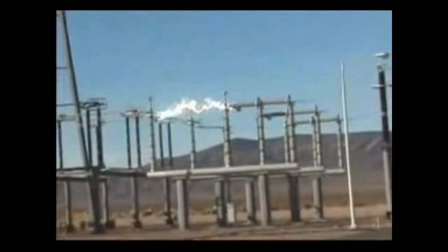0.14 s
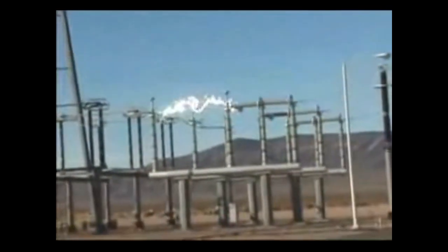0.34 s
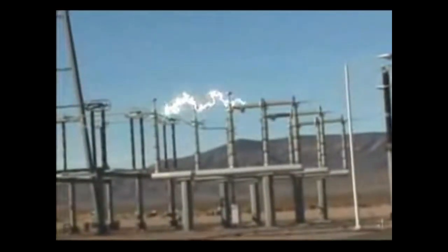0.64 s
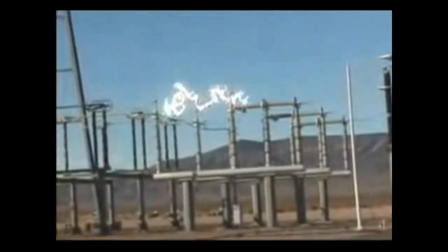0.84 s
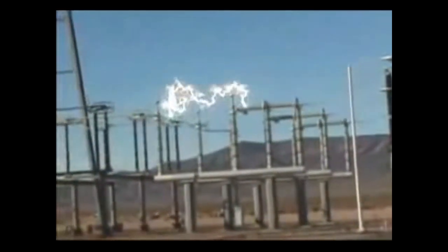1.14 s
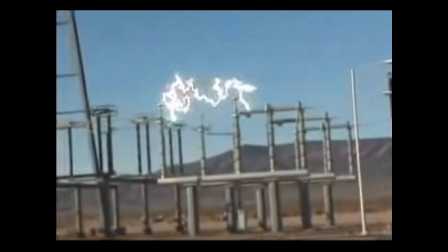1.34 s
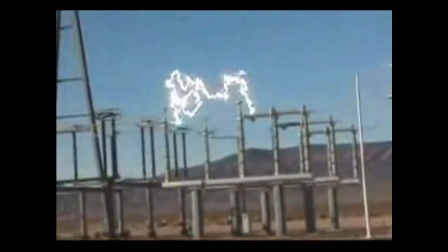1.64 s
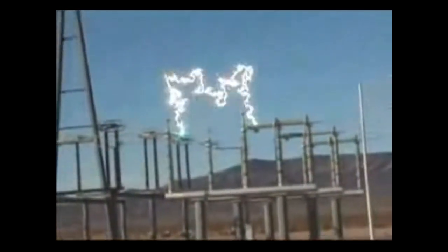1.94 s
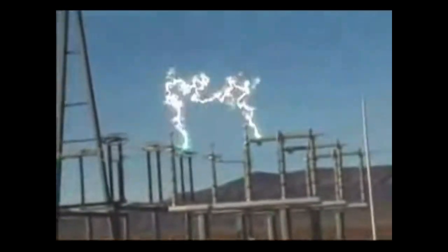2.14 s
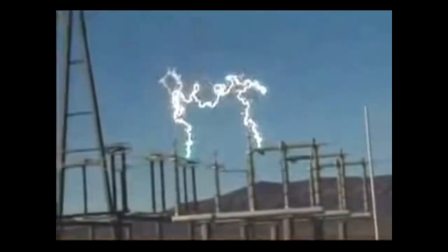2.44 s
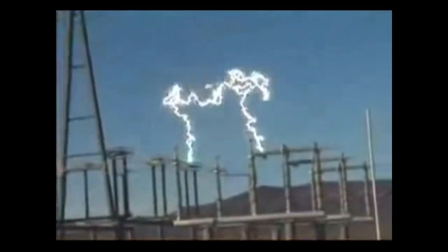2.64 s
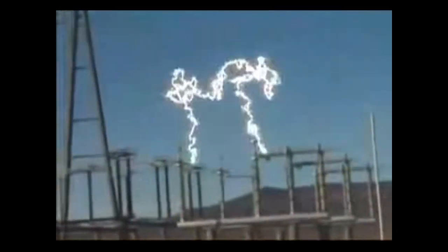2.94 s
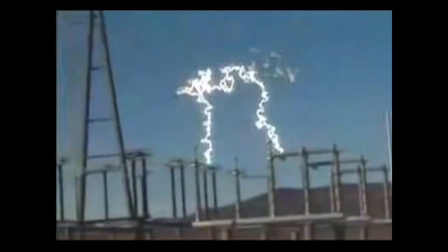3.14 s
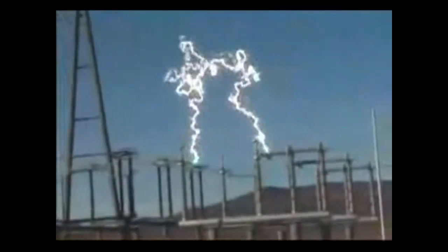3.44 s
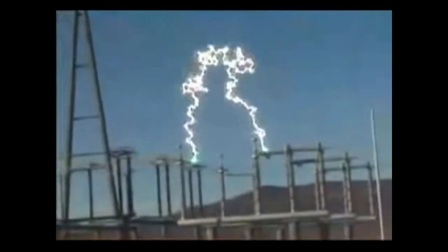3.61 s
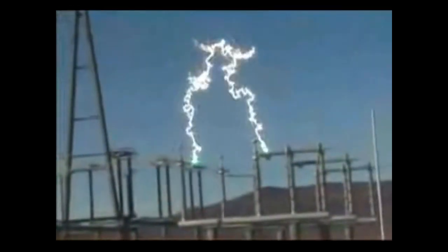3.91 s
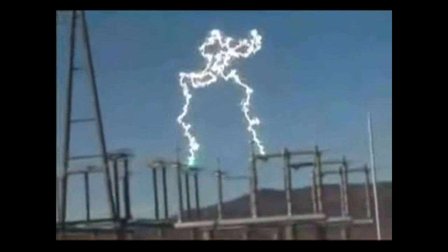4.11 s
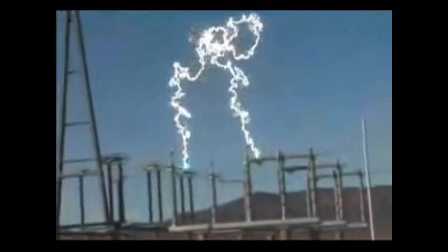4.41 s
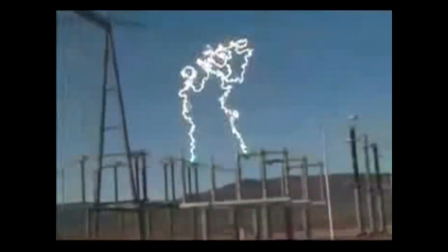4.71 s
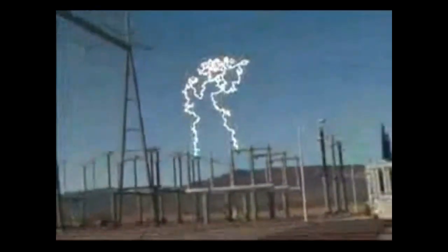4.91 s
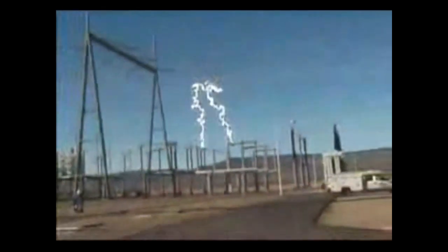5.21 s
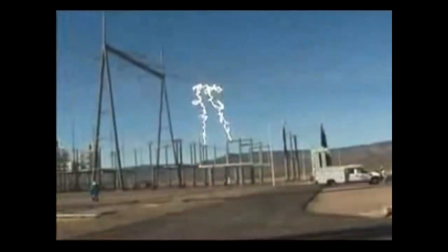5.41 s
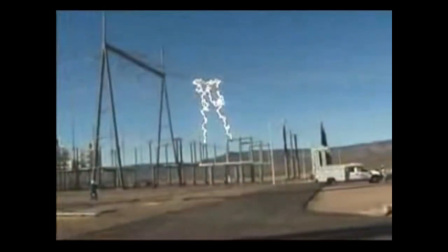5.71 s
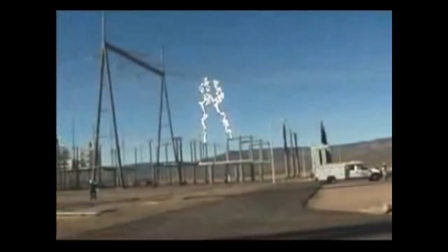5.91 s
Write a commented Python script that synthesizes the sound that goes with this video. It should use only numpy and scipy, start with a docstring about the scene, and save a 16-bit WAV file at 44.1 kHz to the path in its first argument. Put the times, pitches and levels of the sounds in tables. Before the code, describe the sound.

A high-voltage arc is already burning at 0 s in an open substation yard: a loud, low buzz pulsing about 120 times a second, with wavering harmonics and rough flutter. Over it lies dense, raspy crackle, mid-high sizzle and fine fizz. Through the first 1.6 s small dry snaps come rapidly and irregularly over fairly steady hum. From 1.6 to 2.3 s the crackle strengthens and snaps sharpen; at about 2.3 s a dull, low puffing thud. From 2.7 to 4.5 s the cracks are hardest, with a sizzling splash near 3.6 s, while the hum dips and surges unevenly. Around 4.8-5.5 s the low buzz is full again and snaps are sparser. A fainter, low thump falls near 5.6 s, then further sharp cracks, the buzz continuing to the end, about 6 s. Close ground echo thickens cracks, weak reflections follow, and wind is barely audible. Mono, slightly overloaded, with dulled extreme treble.

```python
"""Rising switch arc in a substation yard

A high-voltage switch opens outdoors and draws an arc that climbs and lengthens.
Its heat pulses twice per mains cycle: five wavering harmonics hum, filtered random shocks crackle.
Shorted loops snap as N-shaped shocks with a sizzle; collapsing large loops thud as a puff and a low swing.
The ground adds a lagging close echo, the yard dull delayed copies; light wind is low filtered noise."""
import sys
import numpy as np
from scipy import signal
from scipy.fft import rfft, irfft
from scipy.io import wavfile
from scipy.ndimage import map_coordinates

SR = 44100
rng = np.random.default_rng(int(sys.argv[2]) if len(sys.argv) > 2 else 0)


def generate_wav(signal):
    """Clip the signal to [-1, 1] and save it as 16-bit WAV at the path in sys.argv[1]."""
    frames = np.transpose(np.atleast_2d(signal))
    scaled = np.clip(frames, -1, 1) * 32767
    pcm = np.round(scaled).astype(np.int16)
    wavfile.write(sys.argv[1], SR, pcm)


N = 267246
TIME_S = np.arange(N) / SR

# levels of the hum's four lowest harmonics, before the hum's gain and waver: t/s, level/dB
HARMONIC_1 = [(0.0, -13), (0.47, -16.5), (0.49, -20), (0.73, -21.5), (1.0, -17), (1.82, -18.5), (1.89, -16),
              (2.27, -21.5), (2.29, -23), (2.34, -14.5), (2.47, -16), (2.6, -32), (2.63, -23.5),
              (2.9, -24.5), (3.03, -17), (3.36, -21.5), (3.46, -29), (3.54, -21), (3.62, -31), (3.67, -23),
              (3.82, -37), (3.88, -24), (4.05, -17), (4.11, -38), (4.2, -15.5), (4.35, -16), (4.44, -19.5),
              (4.84, -13), (4.94, -16.5), (5.51, -15), (5.55, -27), (5.66, -21.5), (6.05, -30)]
HARMONIC_2 = [(0.0, -23.5), (0.45, -17), (0.88, -19), (0.93, -17), (1.71, -19.5), (1.91, -37), (2.03, -27),
              (2.23, -25.5), (2.34, -30), (2.43, -20.5), (2.67, -18), (2.71, -23.5), (3.14, -25),
              (3.29, -29), (3.42, -21.5), (3.56, -32.5), (3.7, -19.5), (3.78, -40), (4.1, -19.5),
              (4.38, -35), (4.45, -20), (4.75, -29.5), (4.78, -37), (5.01, -25), (5.1, -31.0),
              (5.259, -25.5), (5.52, -27), (5.6, -35.5), (5.73, -23.5), (6.05, -26.5)]
HARMONIC_3 = [(0.0, -36.5), (0.25, -27.5), (0.58, -31), (0.71, -30), (0.76, -36), (0.87, -28.5),
              (1.03, -26), (1.33, -34), (1.4, -40), (1.54, -26), (1.66, -33), (1.72, -25), (2.17, -42),
              (2.31, -24), (3.26, -36), (3.37, -27), (3.83, -26), (3.9, -40), (4.34, -23), (4.51, -37),
              (4.63, -22), (4.87, -39.5), (5.18, -25.5), (5.24, -28.5), (5.7, -29), (5.79, -21.5),
              (5.94, -32), (6.05, -27)]
HARMONIC_4 = [(0.0, -46.5), (1.42, -44.5), (2.67, -43), (2.71, -35.5), (3.16, -37.5), (3.39, -37),
              (3.42, -38), (3.79, -32.5), (3.95, -28.5), (4.06, -40), (4.15, -37), (4.84, -35.5),
              (5.1, -31), (5.2, -41.5), (5.75, -31), (6.05, -36.0)]
# crackle's drive, before lulls and band gains: t/s, level/dB
CRACKLE_DRIVE = [(0, -32), (.34, -39.5), (.4, -34), (.54, -40.5), (.94, -34), (1.05, -38), (1.5, -33),
                 (1.58, -37), (1.64, -30.5), (1.76, -34.5), (1.92, -29.5), (2.04, -32), (2.32, -26),
                 (2.38, -32), (2.86, -27), (2.92, -31), (3.42, -27.5), (5.6, -30), (5.75, -27.5)]
# rise of the arc: t/s, extra path to listener/ms, ground echo lag/ms, spread of that lag/share,
# flutter level/dB, scatter of the spits' arrival/ms, trend of the crackle's body/dB
ARC_RISE = [(0, 4.64, 1.04, 0.28, -28, 0.97, -31.5), (1.1, 5.2, 1.045, 0.44, -29, 0.96, -29),
            (2.1, 7.55, 1.345, 0.17, -26, 2.14, -28), (3.1, 7.27, 1.616, 0.36, -27.5, 2.18, -28),
            (4.4, 8.5, 1.913, 0.24, -28.5, 2.5, -27), (6.06, 9.1, 2.1, 0.3, -28, 2.45, -27.5)]
# small loops shorting out, before gains: t/s, shock level/dB, shock length/ms, sizzle level/dB
LOOP_SNAPS = [(0.0552, -8.5, 0.91, -34.5), (0.1254, -11.5, 0.65, -31), (0.1582, -10, 0.79, -32.5),
              (0.2048, -13, 0.73, -36), (0.22, -13, 0.98, -39.5), (0.317, -11.5, 0.84, -39.5),
              (0.3204, -17, 0.6, -33), (0.3809, -14, 0.85, -33), (0.3966, -19.5, 0.7, -21.5),
              (0.4171, -13.5, 0.55, -41), (0.4318, -11, 0.56, -40.5), (0.4792, -11, 0.55, -27),
              (0.5967, -10, 0.82, -39.0), (0.674, -11, 0.81, -38), (0.7131, -11.5, 0.85, -41),
              (0.732, -14.5, 0.88, -39), (0.7424, -12, 0.61, -42), (0.8425, -19, 1, -42),
              (0.8578, -14, 0.35, -35.5), (0.9427, -12, 0.93, -35), (0.9624, -14, 0.46, -27),
              (0.9981, -26, 0.41, -19.5), (1.0327, -14, 0.42, -34.5), (1.0395, -10, 0.85, -41.5),
              (1.1187, -11.5, 0.89, -40.0), (1.1314, -17, 1, -36.0), (1.1558, -12, 0.69, -36),
              (1.2195, -14, 0.93, -33.5), (1.256, -15, 1, -38.5), (1.2807, -15, 0.88, -35.5),
              (1.3518, -16, 0.9, -43), (1.462, -11, 0.78, -28), (1.5026, -14.5, 0.31, -23),
              (1.6238, -10.0, 0.42, -26.5), (1.6329, -13, 0.87, -29.5), (1.6591, -12, 0.78, -22),
              (1.7296, -17, 0.77, -29), (1.7682, -6, 0.63, -31), (1.8221, -7, 0.3, -37),
              (1.9147, -17, 0.92, -24), (1.9245, -12, 0.66, -21.5), (1.9711, -8, 0.92, -20.5),
              (2.0764, -8, 1, -31), (2.149, -10, 1, -38.5), (2.1636, -14, 0.74, -26.0),
              (2.1799, -7.5, 0.92, -25.5), (2.1913, -10, 1, -23), (2.2662, -9, 1, -22.5),
              (2.3434, -15, 0.95, -22), (2.5708, -8, 0.85, -39.5), (2.696, -4.5, 0.77, -29),
              (2.761, -5, 0.33, -28.5), (2.8701, -4, 0.47, -21.0), (2.8793, -6, 1, -18.5),
              (2.882, -12, 0.95, -23), (2.9235, -2.5, 0.41, -29), (2.9976, -4.5, 0.47, -18.5),
              (3.0004, -13, 0.7, -25), (3.143, -11, 0.81, -28.5), (3.277, -6, 0.72, -36),
              (3.4127, -6, 0.41, -28.5), (3.4202, -6, 0.41, -21), (3.5378, -10, 0.62, -26),
              (3.5525, -4, 0.79, -17), (3.6233, -7, 0.68, -10.5), (3.6248, -12, 1, -17.5),
              (3.8516, -1.5, 0.42, -21), (3.8996, -4.5, 0.28, -30), (3.9462, -4, 0.43, -20),
              (4.1, -7.0, 0.35, -25), (4.2057, -10.5, 0.69, -31.5), (4.283, -5, 1, -18.5),
              (4.38, -6.5, 0.81, -25), (4.3926, -5.5, 0.65, -33), (4.4305, -4, 0.49, -33),
              (4.5043, -6.5, 0.59, -32.5), (4.6005, -9, 0.3, -21.0), (4.9256, -8.5, 0.32, -31),
              (4.9836, -5, 0.45, -31), (5.0546, -6.5, 0.26, -25.5), (5.2125, -8.5, 0.77, -29),
              (5.5471, -2.5, 0.64, -36), (5.6406, -7.5, 0.82, -36.5), (5.6987, -8, 0.45, -23.0),
              (5.7223, -9, 0.96, -31), (5.8128, -12, 0.43, -18.5), (5.882, -4, 0.23, -24.5),
              (5.928, -4, 0.45, -27), (5.953, -14, 0.9, -19)]
# large loops collapsing: t/s, swing level/dB, swing f/Hz, swing half length/s,
# puff level before gain/dB, top of the puff f/Hz
LOOP_THUDS = [(2.279, -24, 36.3, 0.008, -19, 603), (5.558, -28, 67, 0.014, -34, 333)]
# spectra, relative; power is normalized when applied: f/Hz, level/dB per Hz
BODY_SPECTRUM = [(300, -14), (420, -1), (530, -6.5), (630, 0.5), (760, 2.5), (920, 0.5), (1120, -0.5),
                 (1270, -3.5), (1400, -8), (1900, -50.5)]
SIZZLE_SPECTRUM = [(1100, -33), (1400, -1.5), (1650, 3), (2200, -1.9), (2900, -2), (3300, -5.5),
                   (3700, -4.5), (4300, -18), (6000, -41)]
FIZZ_SPECTRUM = [(2500, -27), (3600, -4), (4200, 2.5), (4800, 1.5), (6000, -6), (8000, -13.5), (10000, -24),
                 (14000, -49.5)]
SNAP_SIZZLE_SPECTRUM = [(300, -12.5), (800, -5.5), (1700, 1), (3000, -0.5), (4800, -7.5), (7500, -14.5),
                        (10000, -30.5), (14000, -44.5)]
FLUTTER_SPECTRUM = [(40, -21), (75, -10), (110, 7), (175, 1), (205, -1.5), (310, 1.5), (400, -4),
                    (520, -26), (800, -55)]
WIND_SPECTRUM = [(12, 1), (25, -11.5), (60, -4), (110, -14), (300, -41.5)]
# echoes from the ground close by and from the yard: delay/s, level/dB
YARD_ECHOES = [(.00108, -40), (.0026, -23.5), (.019, -22), (.043, -20), (.087, -15)]

PULSE_HZ = 119.9  # two heat pulses per mains cycle
# arc changes from short to tall around this time
TALL_AT_S, TALL_OVER_S = 2, 0.65
# stretches of the writhing channel add and cancel by chance, more so in a tall arc
FADE_SHORT_DB, FADE_TALL_DB, FADES_PER_S = 0.5, 1.42, 22
WANDER_SHORT_RAD, WANDER_TALL_RAD = 0.13, 0.47
# arc re-forms elsewhere after a thud: path delay added, and how long the skip takes
SKIP_S, SKIP_OVER_S = 0.004, 0.014
BODY_FOLLOWS = 0.52  # share of the drive's swing about its mean, in dB
SIZZLE_DB, FIZZ_DB, TICK_DB = -0.33, -9.5, 10.5  # against the crackle's drive
# spits over a steady fry: share of the crackle's power, decay time
SPIT_SHARE_SHORT, SPIT_SHARE_TALL, SPIT_DECAY_S = 0.6, 0.45, 0.0012
# lull after a snap whose tabled sizzle is LULL_SNAP_DB, and its healing time
LULL_DB, LULL_SNAP_DB, REGROW_S = -1, -23, 0.078
PUFF_LEAD_S, PUFF_DECAY_S = 0.0091, 0.018  # lead is ahead of the swing's centre
CUTOFF_HZ = 9850


def hum(cycles, shimmer_db, jitter_cycles, hum_db, fifth_db):
    """Current peaks heat the air: five harmonics of the pulse waver as the channel writhes."""
    curves = (HARMONIC_1, HARMONIC_2, HARMONIC_3, HARMONIC_4)
    levels_db = [in_time(curve)[0] for curve in curves]
    levels_db.append(levels_db[-1] + fifth_db)
    fade_db = with_height(FADE_SHORT_DB, FADE_TALL_DB, TIME_S)
    wander_rad = with_height(WANDER_SHORT_RAD, WANDER_TALL_RAD, TIME_S)
    timing = cycles + jitter_cycles * drift(70)
    tone = 0
    for k, level_db in enumerate(levels_db, 1):
        phase_rad = 2 * np.pi * k * timing + wander_rad * k * drift(8)
        waver_db = shimmer_db * k / 2 * drift(45)
        waver_db = waver_db + fade_db * np.sqrt(k / 2) * drift(FADES_PER_S)
        amplitude = np.sqrt(2) * from_db(hum_db + level_db + waver_db)
        tone = tone + amplitude * np.sin(phase_rad)
    return tone


def skips():
    """Delay in seconds that thuds have added to the path so far."""
    return sum(SKIP_S * np.clip((TIME_S - s) / SKIP_OVER_S + 0.5, 0, 1) for s, *_ in LOOP_THUDS)


def crackle(cycles, scatter_ms, body_trend_db):
    """Long kinks give body, short ones sizzle, the finest fizz; some shocks are common to all."""
    sizzle_db = in_time(CRACKLE_DRIVE)[0] + lulls()
    body_db = body_trend_db + BODY_FOLLOWS * (sizzle_db - sizzle_db.mean())
    long_spits = spitting(cycles, scatter_ms, spit_db=2.0, count=3)
    # short kinks keep less to the beat of the mains
    short_spits = spitting(cycles, 1.9 * scatter_ms, spit_db=4.0, count=3)
    common = sparks(cycles, long_spits, per_s=4200, size_db=3.0)
    medium = sparks(cycles, short_spits, per_s=3000, size_db=2.5)
    fine = sparks(cycles, short_spits, per_s=3500, size_db=0.0)
    flare = from_db(1.0 * drift(40))
    sizzle_gain = flare * from_db(sizzle_db)
    body = coloured(common * flare * from_db(body_db), BODY_SPECTRUM)
    sizzle = coloured((0.57 * common + 0.78 * medium) * sizzle_gain, SIZZLE_SPECTRUM)
    fizz_shocks = 0.35 * common + 0.7 * medium + 0.74 * fine
    fizz = coloured(fizz_shocks * sizzle_gain, FIZZ_SPECTRUM)
    return body + from_db(SIZZLE_DB) * sizzle + from_db(FIZZ_DB) * fizz


def lulls():
    """A snap leaves less channel to crackle: a dip in dB, deeper for more sizzle, that heals."""
    kicks = np.zeros(N)
    for s, _, _, sizzle_db in LOOP_SNAPS:
        kicks[round(s * SR)] = from_db((sizzle_db - LULL_SNAP_DB) / 2)
    return LULL_DB * dying(kicks, REGROW_S)


def spitting(cycles, scatter_ms, spit_db, count):
    """Crackle power, mean near 1: stretches re-ignite each half-cycle, varied in time and strength."""
    starts = np.repeat(half_cycle_starts(cycles), count)
    late, strength = np.clip(rng.standard_normal((len(starts), 2)), -2.5, 1.8).T
    at = (starts + late * scatter_ms[starts] / 1000 * SR).astype(int) % N
    kicks = np.bincount(at, from_db(spit_db * strength) ** 2, N)
    spits = dying(kicks, SPIT_DECAY_S)
    share = np.clip(with_height(SPIT_SHARE_SHORT, SPIT_SHARE_TALL, TIME_S), 0, 1)
    return 1 - share + share * spits / spits.mean()


def sparks(cycles, power, per_s, size_db):
    """Tiny shocks from the channel's kinks, denser and stronger during a spit."""
    born = rng.random(N) < per_s * np.sqrt(power) / SR
    spread_db = size_db * np.clip(rng.standard_normal(N), -3, 2.5)
    sizes = from_db(spread_db) * rng.choice([-1, 1], N)
    shocks = born * sizes * np.sqrt(np.sqrt(power))
    return rms_one(kinks(shocks, cycles, nearest_s=0.0001, farthest_s=0.0007, share=0.27))


def kinks(x, cycles, nearest_s, farthest_s, share):
    """Two stretches of channel interfere; their lag and sign change every half-cycle."""
    shape = rng.random((2048, 2))[np.floor(cycles + 0.5).astype(int)]
    lag_s = nearest_s + (farthest_s - nearest_s) * shape[:, 0]
    sign = np.sign(shape[:, 1] - 0.5)
    second = delayed(x, np.round(lag_s * SR) / SR)
    return (x + share * sign * second) / np.sqrt(1 + share ** 2)


def snaps(shock_gain_db, sizzle_gain_db, air_hz, decay_s):
    """A shorted loop sends an N-shaped shock, rounded by the air, and sizzle from finer branches."""
    shocks, sizzle = np.zeros((2, N))
    for s, shock_db, length_ms, sizzle_db in LOOP_SNAPS:
        at = round(s * SR)
        size = max(round(length_ms / 1000 * SR), 4)
        shocks[at:at + size] += from_db(shock_db + shock_gain_db) * np.linspace(1, -1, size)
        train = burst(s, rise_s=0.0002, decay_s=decay_s, crack=0.3)
        sizzle += from_db(sizzle_db + sizzle_gain_db) * train
    return lowpassed(shocks, 2, air_hz) + coloured(sizzle, SNAP_SIZZLE_SPECTRUM)


def ticks(cycles, level_db, scatter_ms, size_db, shortest_s, longest_s, air_hz):
    """Each half-cycle's re-ignition gives a small N-shaped shock of its own size and length."""
    out = np.zeros(N + SR)
    starts = half_cycle_starts(cycles)
    draws = rng.uniform(-1, 1, (len(starts), 3))
    for start, (late, strength, reach) in zip(starts, draws):
        at = max(int(start + late * scatter_ms[start] / 1000 * SR), 0)
        size = max(int(np.interp(reach, [-1, 1], [shortest_s, longest_s]) * SR), 2)
        gain = from_db(level_db[start] + size_db * strength)
        out[at:at + size] += gain * np.linspace(1, -1, size)
    return lowpassed(out[:N], 2, air_hz)


def thuds(puff_low_hz, puff_gain_db):
    """A long stretch goes out at once: a dull puff, and a low tone under a bell-shaped envelope."""
    out = 0
    for s, swing_db, swing_hz, half_length_s, puff_db, top_hz in LOOP_THUDS:
        age_s = TIME_S - s
        envelope = np.exp(-0.5 * (age_s / half_length_s) ** 2)
        swing = np.sqrt(2) * np.sin(2 * np.pi * swing_hz * age_s) * envelope
        shocks = burst(s - PUFF_LEAD_S, rise_s=0.0027, decay_s=PUFF_DECAY_S, crack=0)
        band = signal.butter(2, [puff_low_hz, top_hz], "band", fs=SR, output="sos")
        puff = signal.sosfilt(band, signal.sosfilt(band, shocks))
        out = out + from_db(swing_db) * swing + from_db(puff_db + puff_gain_db) * puff
    return out


def burst(s, rise_s, decay_s, crack):
    """A dying shock train of about unit energy; nothing rings in open air, so near-even spectrum."""
    age_s = TIME_S[:2048]
    envelope = (1 - np.exp(-age_s / rise_s)) * np.exp(-age_s / decay_s)
    shocks = envelope * rng.standard_normal(len(age_s))
    shocks /= np.sqrt(np.sum(shocks ** 2))
    shocks[envelope.argmax()] += crack
    fade = np.exp(-(age_s / (3 * decay_s)) ** 4)
    for _ in range(3):  # flatten the spectrum, then fade the tail again
        shocks = irfft(np.exp(1j * np.angle(rfft(shocks)))) * fade
    out, at = np.zeros(N + len(age_s)), round(s * SR)
    out[at:at + len(age_s)] = shocks
    return out[:N]


def ground(x, lag_ms, spread, share):
    """The ground echo lags more as the arc climbs, lowering its comb; spread smears the treble."""
    heights = np.linspace(-1, 1, 15)
    weights = np.cos(heights * np.pi / 2) ** 2
    echo = sum(w * delayed(x, lag_ms * (1 + spread * h) / 1000) for h, w in zip(heights, weights))
    return x + share * echo / weights.sum()


def yard(x, dull_hz):
    """Ground, steelwork and buildings return dull, weak copies."""
    dull = lowpassed(x, 1, dull_hz)
    return x + sum(from_db(db) * delayed(dull, s) for s, db in YARD_ECHOES)


def flutter(level_db):
    """No two half-cycles are alike: low noise fills the gaps between the hum's harmonics."""
    return from_db(level_db) * coloured(rng.standard_normal(N), FLUTTER_SPECTRUM)


def wind(level_db):
    """Light wind on the microphone: low filtered noise."""
    return from_db(level_db) * coloured(rng.standard_normal(N), WIND_SPECTRUM)


def from_db(db):
    """Amplitude ratio of a level."""
    return 10 ** (np.asarray(db) / 20)


def rms_one(x):
    """Scales to unit RMS."""
    return x / np.sqrt(np.mean(x ** 2) + 1e-20)


def in_time(rows):
    """Each column of a curve, joined by straight lines."""
    s, *columns = np.transpose(rows)
    return [np.interp(TIME_S, s, c) for c in columns]


def with_height(short, tall, s):
    """Glides from a short arc's value to a tall arc's."""
    return short + (tall - short) * (0.5 + 0.5 * np.tanh((s - TALL_AT_S) / TALL_OVER_S))


def half_cycle_starts(cycles):
    """Samples just before a new heat pulse begins."""
    return np.flatnonzero(np.diff(np.floor(cycles)) > 0)


def dying(kicks, decay_s):
    """Each kick decays exponentially."""
    return signal.lfilter([1], [1, -np.exp(-1 / (decay_s * SR))], kicks)


def drift(rate_per_s):
    """Smooth random curve, knots of spread 1."""
    knots = rng.standard_normal(4096)
    return map_coordinates(knots, [TIME_S * rate_per_s], order=2, mode="wrap")


def delayed(x, seconds):
    """Delay, fixed or varying, by linear interpolation."""
    return np.interp(TIME_S - seconds, TIME_S, x, left=0)


def lowpassed(x, order, cutoff_hz):
    """Butterworth low-pass."""
    return signal.sosfilt(signal.butter(order, cutoff_hz, fs=SR, output="sos"), x)


def coloured(x, spectrum):
    """Causal (minimum-phase) filter of the given spectrum; white input keeps its power."""
    size = 8192
    table_hz, table_db = np.transpose(spectrum)
    bins_hz = np.arange(size // 2 + 1) * SR / size
    gain = rms_one(from_db(np.interp(np.log(bins_hz + 1), np.log(table_hz), table_db)))
    cepstrum = irfft(np.log(gain))
    cepstrum[1:size // 2] *= 2
    cepstrum[size // 2 + 1:] = 0
    return signal.fftconvolve(x, irfft(np.exp(rfft(cepstrum))))[:N]


def scene():
    """One rising arc over hard ground in a light wind."""
    path_ms, ground_ms, spread, flutter_db, scatter_ms, body_db = in_time(ARC_RISE)
    cycles = PULSE_HZ * (TIME_S - path_ms / 1000 - skips())
    tone = hum(cycles, shimmer_db=0.86, jitter_cycles=0.0031, hum_db=-0.5, fifth_db=-3.5)
    spits = ground(crackle(cycles, scatter_ms, body_db), ground_ms, spread, share=0.45)
    shocks = snaps(shock_gain_db=0.0, sizzle_gain_db=16.5, air_hz=2980, decay_s=0.0017)
    tick_db = in_time(CRACKLE_DRIVE)[0] + TICK_DB
    shocks = shocks + ticks(cycles, tick_db, scatter_ms, size_db=5,
                            shortest_s=0.00029, longest_s=0.0008, air_hz=3170)
    # a snap or tick comes from one spot, so its ground echo is a crisp second crack
    cracks = ground(shocks, ground_ms, spread=0.022, share=0.73)
    arc = tone + yard(spits + cracks, dull_hz=2930)
    arc = arc + thuds(puff_low_hz=70, puff_gain_db=49.0)
    return (arc + flutter(flutter_db) + wind(level_db=-49.5))[None]


def record(dry):
    """Peaks are rounded, the top is cut."""
    ceiling = 0.56
    rounded = dry / (1 + (dry / ceiling) ** 6) ** (1 / 6)
    return signal.sosfilt(signal.ellip(8, 0.1, 50, CUTOFF_HZ, fs=SR, output="sos"), rounded)


dry = scene()
out = record(dry)
generate_wav(out)
```